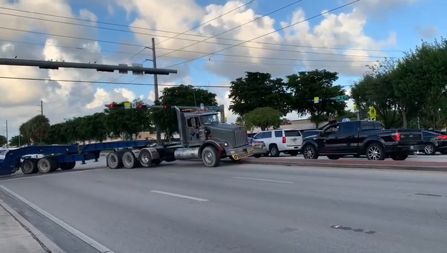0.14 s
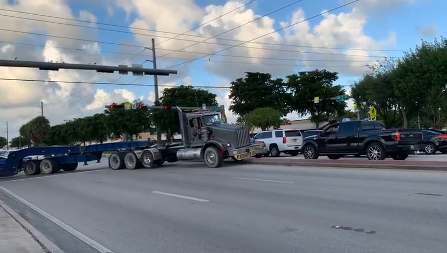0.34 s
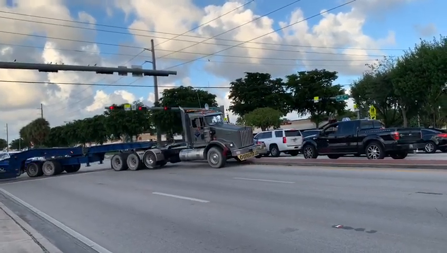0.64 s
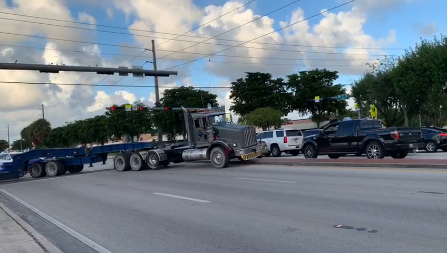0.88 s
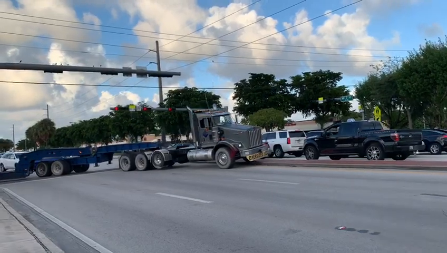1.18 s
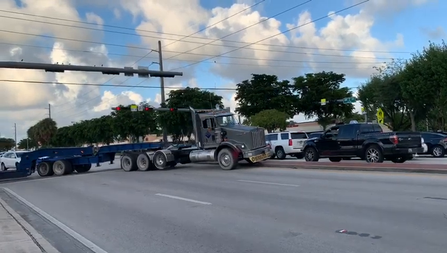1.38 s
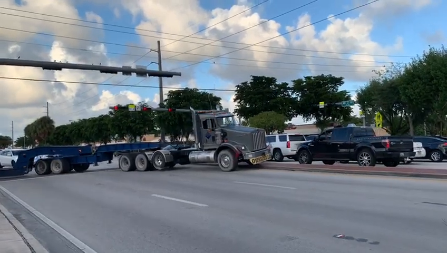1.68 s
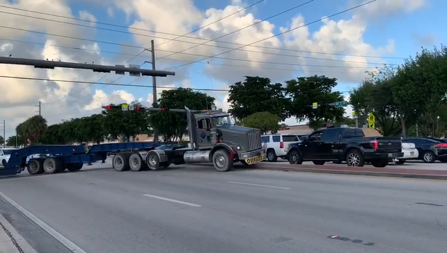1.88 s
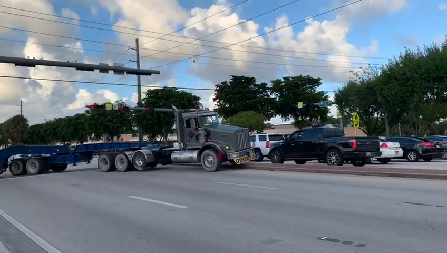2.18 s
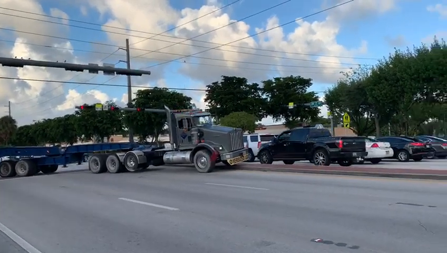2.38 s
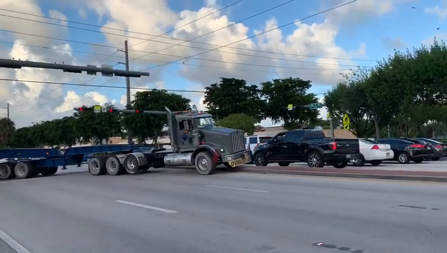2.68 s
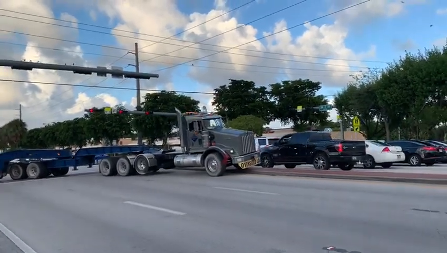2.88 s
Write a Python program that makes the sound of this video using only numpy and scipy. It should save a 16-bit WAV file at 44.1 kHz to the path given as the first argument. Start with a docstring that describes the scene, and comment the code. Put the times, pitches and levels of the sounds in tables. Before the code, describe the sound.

Low diesel truck rumble and engine hum over soft tyre and traffic wash, swelling near one and a half to two seconds, with tiny metallic squeals; outdoors on a wide road, phone-like stereo pickup, dull treble.

```python
"""Wavering engine hums over a low wash of engine and tyre noise: a heavy diesel truck crawls across a wide road
among idling traffic. Hums are sines of drifting pitch, the wash is noise shaped in pitch and time, and exhaust
beats are noise bursts ringing in a pipe. Engine surges and squeals are noise through narrow resonances; a brake
squeak is a pair of falling sines; a thin hiss sits mostly on the right.
Two microphone ports hear the engines, wash and low squeak with a phase twist that changes with pitch."""
import sys
import numpy as np
from scipy import signal
from scipy.fft import rfft, irfft, next_fast_len
from scipy.io import wavfile
from scipy.ndimage import map_coordinates

SR = 44100
rng = np.random.default_rng(int(sys.argv[2]) if len(sys.argv) > 2 else 0)


def ratio(d):
    """dB to gain"""
    e = np.asarray(d, float) / 20
    return 10 ** e


def wav_out(sig):
    """Save sig, one row per channel (or a flat mono array), as 16-bit PCM at SR to the path in sys.argv[1]."""
    wavfile.write(sys.argv[1], SR, np.round(np.clip(np.atleast_2d(sig).T, -1, 1) * 32767).astype(np.int16))


N = 134064  # samples

# Swells of the noise: start_s, rumble_db, growl_db, clatter_db, hiss_db, bark_db.
# Rumble, growl, clatter and bark move the wash about their means; growl also leads the beats, hiss the hiss.
SWELL = [(0.0, -24, -40.5, -51.5, -62, -48), (0.24, -17, -38, -53, -62.5, -48.5),
         (0.38, -22.5, -40, -50, -61.5, -49), (0.55, -15, -40, -53, -60, -49.5),
         (0.63, -26, -39, -51.5, -65.5, -57), (0.68, -21.5, -41, -52, -61, -48),
         (0.99, -22.5, -42.5, -54, -64.5, -51.5), (1.36, -23, -38, -51.5, -61.5, -50),
         (1.47, -17.5, -32, -49.5, -56, -45), (1.63, -25, -41, -53, -66, -49.5),
         (1.77, -22.5, -38, -50.5, -59, -47), (1.83, -20.5, -32, -46.5, -57.5, -41.5),
         (1.87, -15, -31, -50.5, -57.5, -45), (2.04, -21, -39, -49.5, -60.5, -49),
         (2.15, -20, -34.5, -48.5, -59, -45), (2.81, -23, -42.5, -53, -64, -48.5),
         (2.99, -25.5, -43, -53.5, -62, -49.5), (3.04, -25.5, -41.5, -54.5, -63.5, -47.5)]
# Centres of rumble, growl, bark and clatter: pitch_hz
SWELL_CENTRES = [150, 600, 1250, 1900]
# Colour of the engine, road and tyre noise: pitch_hz, relative_db_per_hz
WASH_COLOUR = [(30, -9.5), (45, -4), (100, -3), (160, -6), (215, -6.5), (260, -18.5), (500, -22.5),
               (590, -17.5), (680, -27), (800, -32), (1050, -29.5), (1300, -38), (1800, -35.5), (2200, -40),
               (2600, -51.5), (3600, -47), (4000, -53), (4400, -64), (6300, -63.5)]
# Hollows in that colour: pitch_hz, relative_db_per_hz
WASH_VALLEYS = [(320, -19.5), (420, -18.5), (940, -36), (3100, -48), (5200, -59), (7000, -66), (7600, -68),
                (7800, -72)]
# How far narrow strips of the wash may sink for a moment: pitch_hz, depth_db
FLICKER_DEPTH = [(220, 6), (340, 22), (480, 5), (1500, 8), (2200, 8), (2700, 24), (3700, 10), (4500, 22),
                 (6300, 14), (7800, 25)]
# Colour of the hiss, first row not used: pitch_hz, relative_db_per_hz
HISS_COLOUR = [(7800.0, -29), (8050.0, 4), (8600.0, -6), (9300.0, -11.5), (10400.0, -17.5),
               (11000.0, -21.5), (11600.0, -27.5), (11900.0, -35.5)]
# Pitches of the idling engines nearby: pitch_hz
IDLE_PITCHES = [88.36, 95.95, 133.7, 155.2]
# Their balance over time, one column per engine: start_s, relative_db, relative_db, relative_db, relative_db
IDLE_LEVELS = [(0.0, -31.5, -26.5, -33.5, -28), (0.24, -40, -24, -35, -27), (0.498, -22, -33, -34.5, -28.5),
               (0.66, -33, -32, -28.5, -35), (1.41, -47.5, -31.5, -26.5, -31),
               (1.47, -27, -17.5, -19.5, -15), (1.689, -33, -52, -33.5, -31.5),
               (1.851, -33.5, -25.5, -31.5, -33.5), (2.03, -39, -20.5, -26.5, -30.5),
               (2.28, -31.5, -44, -37, -18), (3.01, -35.5, -30, -23.5, -35),
               (3.04, -27, -42.5, -43.5, -63.5)]
# Truck firing rate and the hum at that pitch: start_s, pitch_hz, level_db
FIRING = [(0.0, 46.04, -45), (0.13, 45.1, -40.5), (0.44, 44.92, -44), (1.21, 37.46, -47),
          (1.53, 44.53, -19), (1.68, 45.92, -38), (1.9, 49.96, -19), (2.03, 48.16, -40), (2.16, 45.8, -27),
          (2.32, 45.84, -21), (2.55, 40.38, -46), (2.87, 35.4, -38), (3.04, 34.6, -38.5)]
# A higher engine hum: start_s, pitch_hz, level_db
UPPER_HUM = [(0, 200, -25), (.2, 203, -23.5), (.55, 206, -32.5), (.8, 200, -30.5), (1.05, 186, -35.5),
             (1.35, 184, -42.5), (1.55, 200, -27), (1.9, 208, -28), (2.3, 212, -31.5), (2.5, 200, -35),
             (2.7, 182, -30.5), (3.04, 168, -49.5)]
# Exhaust pipe resonances: pitch_hz, width_hz, relative_db
PIPE = [(588, 33, 1.5), (705.4, 46, -2), (452, 41, 0.5), (1186, 34, -21), (1305, 58, -10)]
# Engine surges, narrow nearly tonal, broad a rough roar: start_s, length_s, pitch_hz, width_hz, level_db
ROARS = [(0.064, 0.34, 579, 14, -39.5), (1.4, 0.11, 589.7, 16, -38), (2.098, .22, 594.5, 20, -38.5),
         (2.942, .12, 67, 16, -24.5), (1.397, 0.1, 1204, 320, -42.5), (1.777, .16, 1270, 450, -42),
         (2.133, 0.27, 1820, 410, -50), (2.527, 0.12, 1820, 270, -47)]
# Short rough squeals of metal: peak_s, length_s, pitch_hz, width_hz, level_db
SQUEALS = [(0.495, 0.046, 3870, 120, -57.5), (1.147, 0.12, 3560, 200, -57),
           (1.49, 0.056, 8120, 251.4, -55.5), (2.106, 0.14, 3710, 196, -57),
           (2.335, 0.12, 3590, 300, -53.5), (2.982, 0.061, 10470, 500, -57)]
# Third partial of the brake squeak: start_s, pitch_hz
SQUEAK_GLIDE = [(1.52, 10950), (1.565, 10450), (1.6, 10230), (1.65, 10040), (1.69, 9900), (1.73, 9740)]
# Moments when that partial flares: peak_s
SQUEAK_GRIPS = [1.548, 1.566, 1.59, 1.635, 1.695]
# Phase by which the right port trails the left: pitch_hz, lag_rad
PORT_TWIST = [(40, .05), (130, .42), (215, 1.37), (300, 2.86), (390, 3.3), (470, 4.37), (560, 5.34),
              (650, 6.0), (730, 6.62), (820, 9.25), (990, 9.3), (1080, 9.9), (1160, 12.3), (1340, 12.7),
              (1760, 11.4), (2020, 12.25), (2650, 12.4)]
# Pitches at which the right channel's sign turns over, and back again: pitch_hz
RIGHT_SIGN_FLIPS = [2740, 3520, 4660, 5660, 6850, 7700]
# Likeness of the two ports: pitch_hz, likeness_0_to_1
PORT_LIKENESS = [(40, .97), (215, .93), (270, .72), (330, .97), (400, .95), (480, .75), (600, .92),
                 (780, .55), (940, .95), (1120, .5), (1500, .7), (2500, .75), (3000, .55), (3500, .6),
                 (3900, .93), (4400, .99), (7800, .99)]
# Right port over left: pitch_hz, gain_db
PORT_BALANCE = [(40, -.2), (150, -1), (300, 0), (590, 2.5), (940, 0), (1300, 2), (1800, 0), (8000, 0)]

T = np.arange(N) / SR  # time, s
HIGH_LEFT_DB = -16  # left under right, for the hiss and the squeals above 8 kHz


def rms_one(x):
    """Scale to rms 1."""
    return x / np.sqrt(np.mean(x ** 2) + 1e-20)


def in_time(rows):
    """Glide between a table's rows, giving each column sample by sample."""
    s, *columns = np.transpose(rows)
    return [np.interp(T, s, column) for column in columns]


def at_hz(points, hz):
    """Read a table on a log-frequency axis."""
    pitches, values = np.transpose(points)
    return np.interp(np.log(np.maximum(hz, 1)), np.log(pitches), values)


def drift(rate):
    """Slow random wander of rms 1: noise through a double one-pole lowpass at rate (Hz)."""
    pole = np.exp(-80 * np.pi * rate / SR)  # runs on every 40th sample
    noise = rng.standard_normal(N // 40 + 2002)
    slow = signal.lfilter([1], [1, -2 * pole, pole * pole], noise)[2000:]
    return np.interp(np.arange(N) / 40, np.arange(len(slow)), rms_one(slow - slow.mean()))


def resonance(x, hz, width_hz):
    """Ring a two-pole resonance of gain 1 at its peak."""
    r = np.exp(-np.pi * width_hz / SR)
    top = np.array([1, 0, -1]) * (1 - r * r) / 2
    return signal.lfilter(top, [1, -2 * r * np.cos(2 * np.pi * hz / SR), r * r], x)


def ring_twice(x, hz, width_hz):
    """Pass a sound through the same resonance twice, for steeper skirts."""
    return resonance(resonance(x, hz, width_hz), hz, width_hz)


def coloured(spectrum, moving_db, depth):
    """Two noises of one colour and moving gain, with strips that sink by chance; rms near 1 at rest."""
    patch_s, threshold = .04, .1
    hz, s, z = signal.stft(rng.standard_normal((2, N)), SR, nperseg=2048, noverlap=1536)
    at = np.minimum((s * SR).astype(int), N - 1)
    # strips widen with pitch; each draws its own chance over time
    strip, step = np.meshgrid(.36 * hz ** .55, s / patch_s, indexing="ij")
    where = [np.round(strip), step]
    grids = rng.standard_normal((2, 120, 400))
    chance = np.array([map_coordinates(grid, where, order=1, mode="nearest") for grid in grids])
    sink = ratio(-at_hz(depth, hz)[:, None] * np.clip(2 * (chance - threshold), 0, 1))
    # make up the average loss at each pitch
    sink = sink / np.sqrt(np.mean(sink ** 2, axis=(0, 2)))[:, None]
    colour_db = at_hz(spectrum, hz)
    gain = ratio(colour_db[:, None] + moving_db(hz, at)) * sink
    still = np.sqrt(np.mean(ratio(colour_db) ** 2))
    return signal.istft(z * gain / still, SR, nperseg=2048, noverlap=1536)[1][:, :N]


def wash():
    """Engine and tyre noise; each pitch region follows its own swell, the treble that of the clatter."""
    rumble, growl, clatter, _, bark = [c - c.mean() for c in in_time(SWELL)]
    swings = np.array([rumble, growl, bark, clatter])
    regions = np.arange(4)

    def moving(hz, at):
        place = np.interp(np.log(np.maximum(hz, 1)), np.log(SWELL_CENTRES), regions)
        share = np.maximum(1 - abs(place[:, None] - regions), 0)
        return share @ swings[:, at]

    colour = [(12, -21.0), (25, -21)] + sorted(WASH_COLOUR + WASH_VALLEYS) + [(8100, -88.5)]
    return ratio(-21) * coloured(colour, moving, FLICKER_DEPTH)


def hiss():
    """A thin band of high noise, mostly on the right; its upper part drops out now and then."""
    drop_db, drop_rate_hz, patchy_db = 25, 6.6, 1.5
    drops = drop_db * np.clip(2 * (drift(drop_rate_hz) - .6), 0, 1)

    def moving(hz, at):
        return -np.clip((hz[:, None] - 8700) / 300, 0, 1) * drops[at]

    colour = [(7500, -54.5), (7930, -23.5)] + HISS_COLOUR[1:] + [(12300, -84)]
    level = ratio(in_time(SWELL)[3] + 7.0)
    a, b = level * coloured(colour, moving, [(8000, patchy_db)])
    left = ratio(HIGH_LEFT_DB) * (0.66 * a + 0.64 * b)  # only partly like the right
    return np.array([left, a])


def hum(hz, db):
    """A sine that wavers a little in pitch, its level an rms."""
    waver_hz = 1.513
    cycles = np.cumsum(hz + waver_hz * drift(3.42)) / SR
    return np.sqrt(2) * ratio(db) * np.sin(2 * np.pi * (cycles + rng.random()))


def idling_engines():
    """Steady engines nearby: one wavering hum each, with its own level curve."""
    share_db = -3
    return sum(hum(hz, db + share_db) for hz, db in zip(IDLE_PITCHES, in_time(IDLE_LEVELS)))


def exhaust():
    """One uneven puff per firing, a decaying burst of noise, rings the resonances of the pipe."""
    uneven_db, beat_db = 3, -5.5  # spread between puffs; beats against the growl level
    cycles = np.cumsum(in_time(FIRING)[0] * (1 + .05 * drift(15))) / SR
    strength = ratio(uneven_db * rng.standard_normal(200))[cycles.astype(int)]
    puffs = strength * np.exp(-3 * (cycles % 1)) * rng.standard_normal(N)
    pipe = np.zeros(N)
    for k, (hz, width_hz, db) in enumerate(PIPE):
        pipe += ratio(db) * ring_twice(puffs, hz, width_hz) * (-1) ** k  # signs alternate
    return ratio(in_time(SWELL)[1] + beat_db) * rms_one(pipe)


def roars():
    """Engine surges: throbbing noise twice through a resonance, with quick rise, hold and slower fall."""
    edge_s, rough_db = .012, 2.5  # the fall lasts two edges
    out = np.zeros(N)
    for s, length, hz, width_hz, db in ROARS:
        tone = ring_twice(rng.standard_normal(N), hz, width_hz) * ratio(rough_db * drift(45))
        tone = tone / np.std(tone[(T > s) & (T < s + length)])
        rise = (T - s) / edge_s
        fall = 1 + (s + length - T) / (2 * edge_s)
        out += ratio(db) * tone * np.clip(np.minimum(rise, fall), 0, 1)
    return out


def squeals():
    """Metal squeals: noise twice through a resonance, under a soft swell; above 8 kHz they sit right."""
    out = np.zeros((2, N))
    for s, length, hz, width_hz, db in SQUEALS:
        tone = rms_one(ring_twice(rng.standard_normal(N), hz, width_hz))
        swell = np.exp(-((T - s) / (length / 2)) ** 2)
        sides = ratio([[HIGH_LEFT_DB * (hz > 8000)], [0]])
        out += ratio(db) * tone * swell * sides
    return out


def squeak():
    """A falling brake whistle: a smooth low partial, and its throbbing, fading third one on the right."""
    low_db, high_db, left_db = -49.5, -46, -23
    grip_s, throb_db, fade_db_per_s = .011, 13, 25.5
    hz, = in_time(SQUEAK_GLIDE)
    rise = (T - SQUEAK_GLIDE[0][0]) / 0.042
    fall = (SQUEAK_GLIDE[-1][0] - T) / .04
    on = np.clip(np.minimum(rise, fall), 0, 1)
    phase = 2 * np.pi * np.cumsum(hz + 15 * drift(40)) / SR
    flare = np.max([np.exp(-((T - s) / grip_s) ** 2) for s in SQUEAK_GRIPS], axis=0)
    throb = ratio(throb_db * (flare - 1) - fade_db_per_s * (T - 1.65))
    low = on * ratio(low_db) * np.sin(phase / 3)
    high = on * throb * ratio(high_db) * np.sin(phase) * ratio([[left_db], [0]])
    return low, high


def ports(shared, apart):
    """The shared sound reaches both ports with a twist of phase; the unlike part goes in with opposite signs.
    The right channel's sign also turns over at set pitches."""
    size = next_fast_len(N + 8192)
    hz = np.fft.rfftfreq(size, 1 / SR)
    alike = np.clip(at_hz(PORT_LIKENESS, hz), 0, 1)
    flips = sum(np.clip((hz - f) / 80 + .5, 0, 1) * (-1) ** k for k, f in enumerate(RIGHT_SIGN_FLIPS))
    twist = np.interp(hz, *np.transpose(PORT_TWIST)) + np.pi * flips
    common = rfft(shared, size) * np.sqrt((1 + alike) / 2)
    unlike = rfft(apart, size) * np.sqrt((1 - alike) / 2)
    left = common + unlike
    right = (common - unlike) * ratio(at_hz(PORT_BALANCE, hz)) * np.exp(-1j * twist)
    return np.array([irfft(left, size)[:N], irfft(right, size)[:N]])


def scene():
    """Mix truck and traffic through the ports, with the squeals and high sounds added beside them."""
    shared, apart = wash()
    low, high = squeak()
    truck = exhaust() + roars() + hum(*in_time(FIRING)) + hum(*in_time(UPPER_HUM))
    engines = truck + idling_engines()
    return ports(shared + engines + low, apart) + high + hiss() + squeals()


def top_cut(x):
    """Nothing passes above the cut-off."""
    return signal.sosfilt(signal.butter(12, 11650, fs=SR, output="sos"), x)


def record(dry):
    """Hand over the finished mix."""
    return top_cut(dry)


dry = scene()
out = record(dry)
wav_out(out)
```